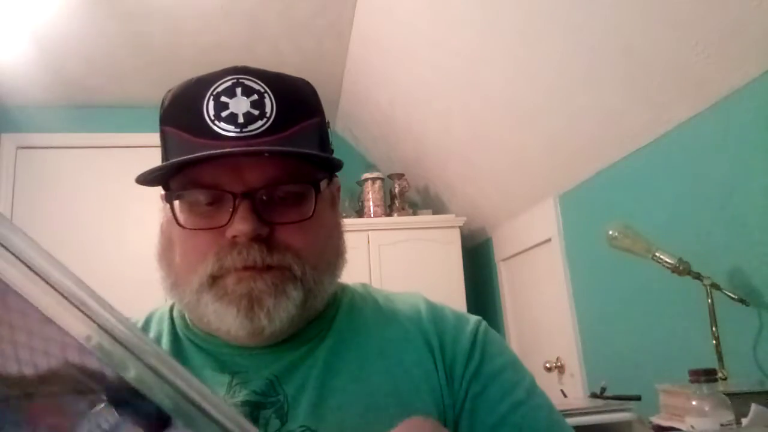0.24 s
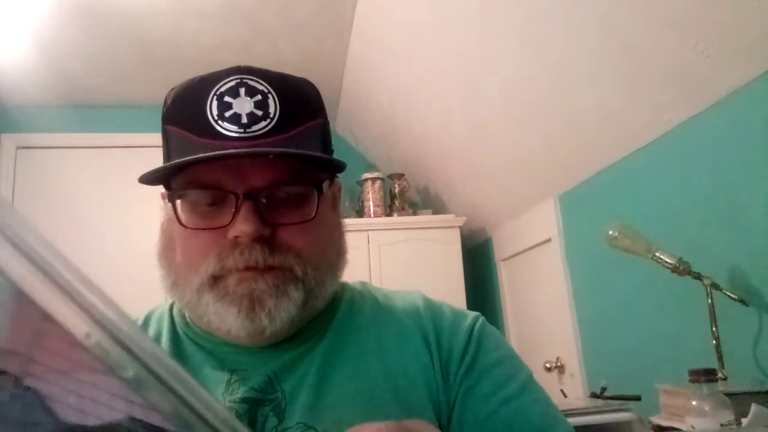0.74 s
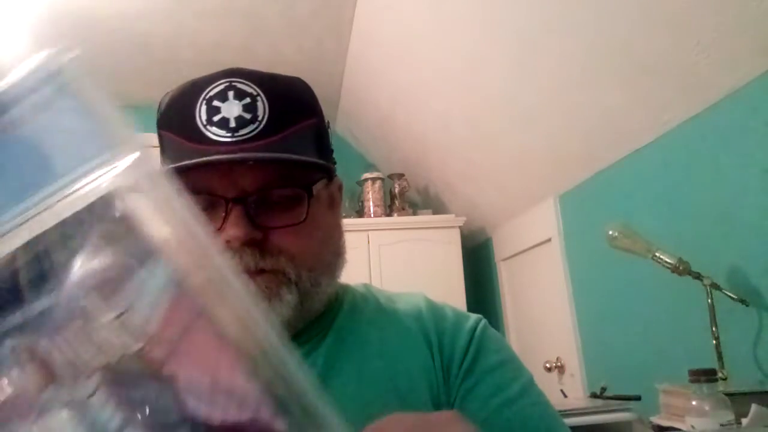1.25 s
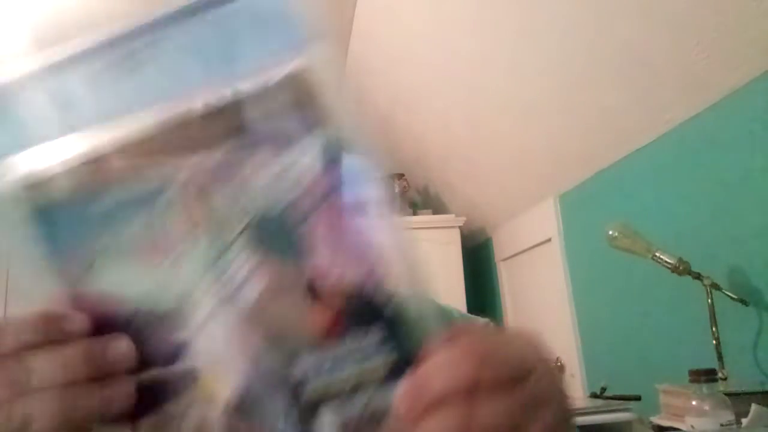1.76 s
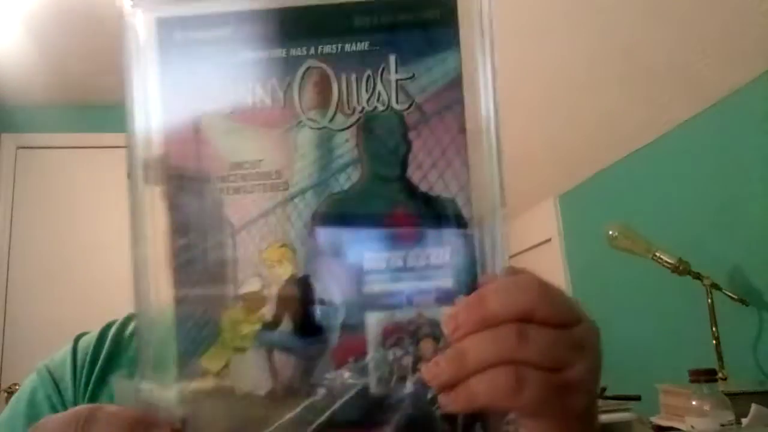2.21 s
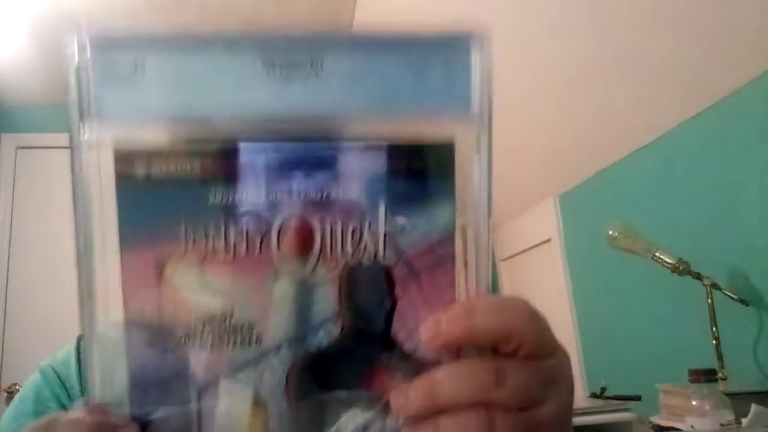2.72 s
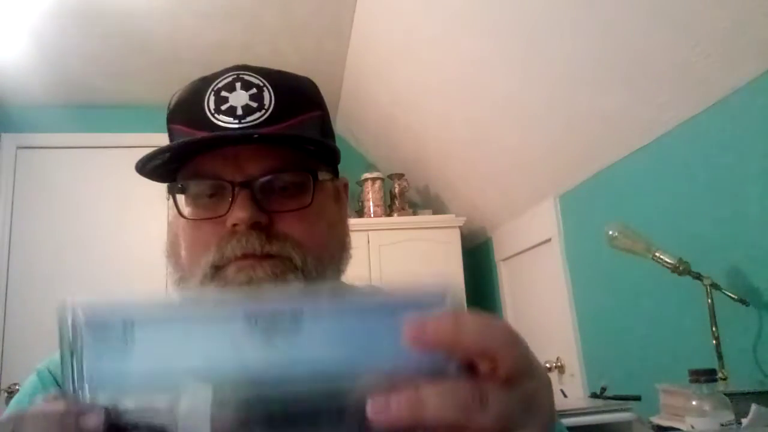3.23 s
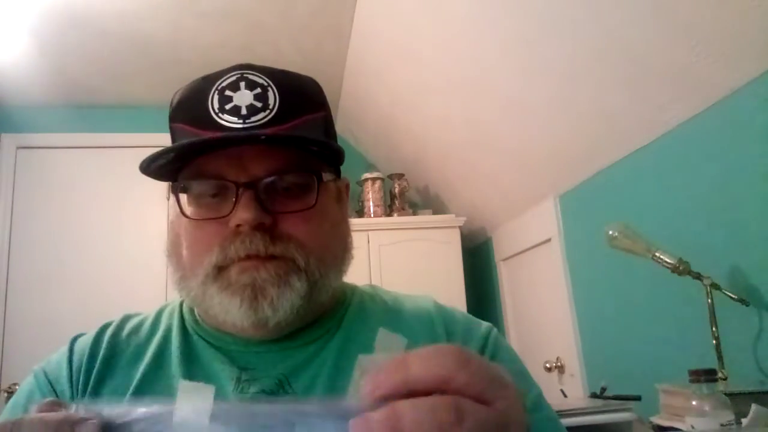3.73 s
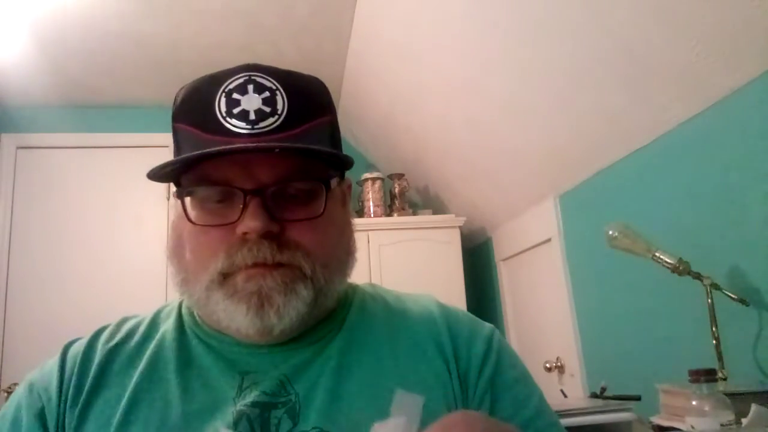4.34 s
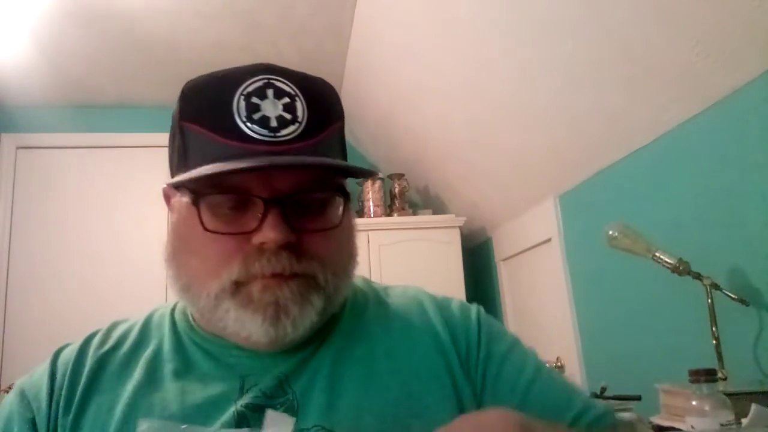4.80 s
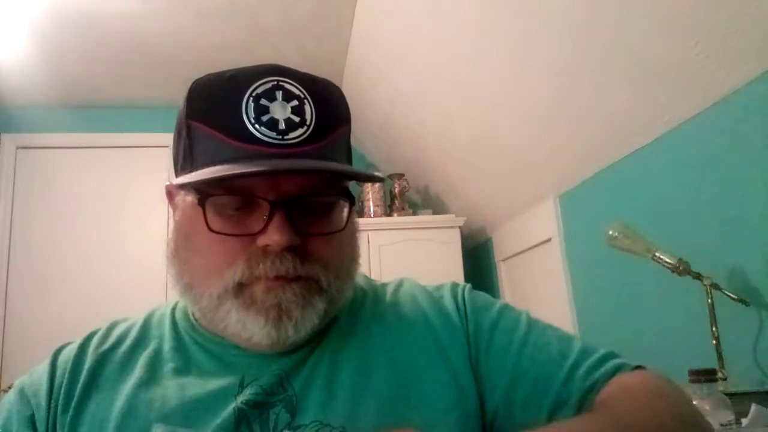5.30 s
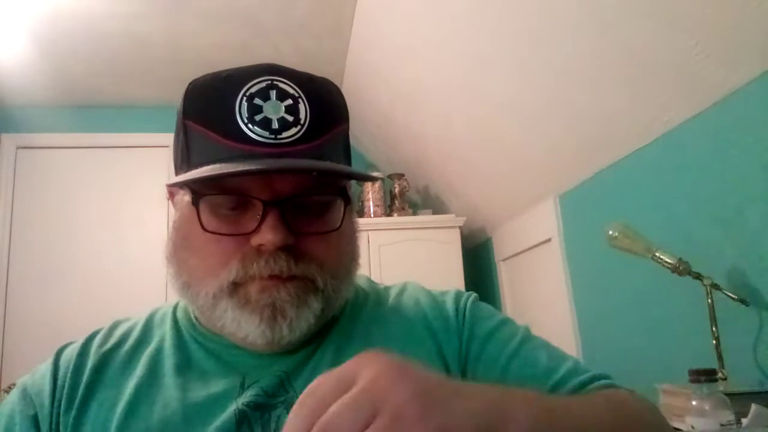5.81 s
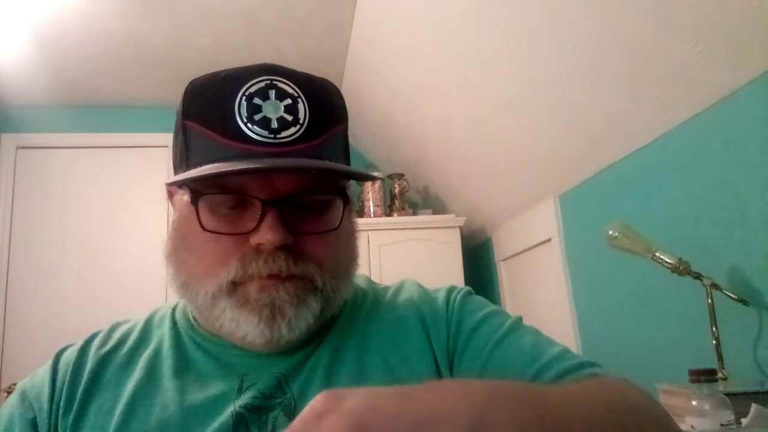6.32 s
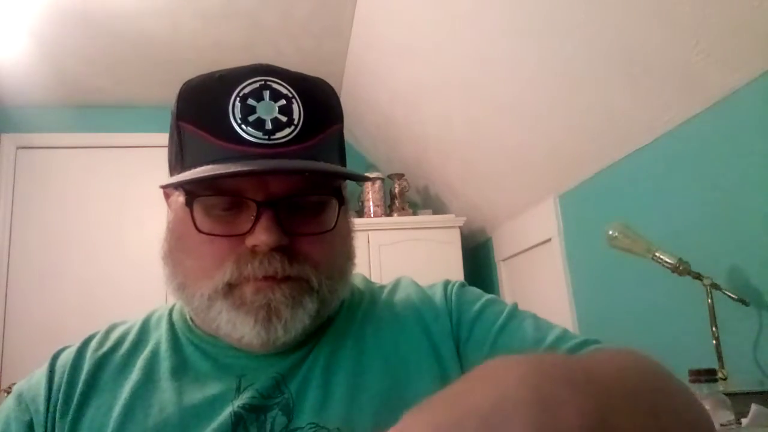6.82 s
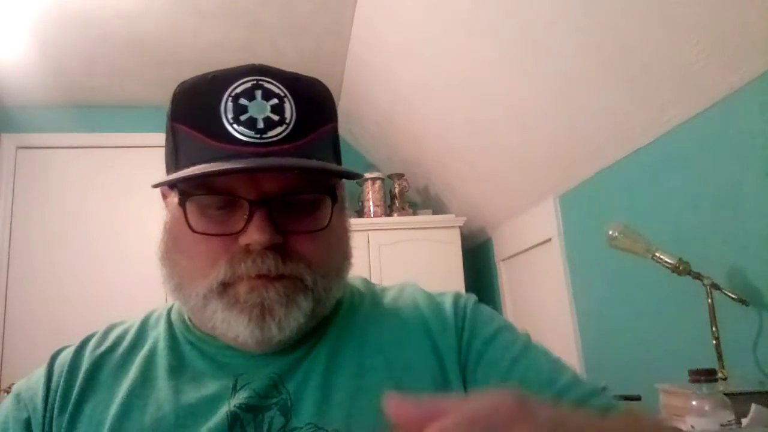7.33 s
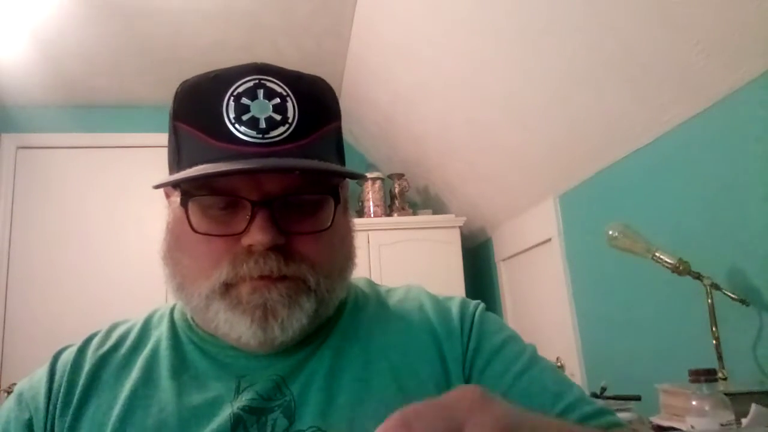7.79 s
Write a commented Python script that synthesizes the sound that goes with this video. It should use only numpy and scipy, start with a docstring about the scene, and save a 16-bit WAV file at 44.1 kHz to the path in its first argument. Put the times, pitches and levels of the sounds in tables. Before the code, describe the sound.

Close to a small microphone in a small room, hard plastic cases in thin sleeves are handled at a desk. Faint crinkles and a sharp snap come first, then sliding film, then a busy middle of dense crackling, thick creases snapping, rubbing and hollow knocks. It thins out to a faint scrape and a few last clicks over soft desk boom and faint hiss.

```python
"""Hard plastic comic cases are handled at a desk in a small room, close to a small microphone.
First a few faint crinkles and one sharp snap with a light knock; then the thin plastic sleeve slides more often.
In the middle, clumps of tiny buckles crackle and larger creases snap thickly; the case rubs, scrapes and knocks.
Later the moves thin out to a faint scrape and a last few snaps. Noise through the desk's resonances booms softly
throughout, decaying noise makes the walls answer, and filtered noise leaves a faint hiss."""
import sys
import numpy as np
from scipy import signal
from scipy.fft import rfft, irfft, next_fast_len
from scipy.io import wavfile
from scipy.ndimage import uniform_filter1d, map_coordinates

SR = 44100
rng = np.random.default_rng(int(sys.argv[2]) if len(sys.argv) > 2 else 0)


def wrap_up_sound(samples):
    """Save the sound to the file named by the first command line argument, as 16-bit audio."""
    columns = np.atleast_2d(samples).T
    # keep every value between -1 and 1, then stretch to whole-number steps
    tamed = np.clip(columns, -1, 1)
    steps = np.round(tamed * 32767).astype(np.int16)
    wavfile.write(sys.argv[1], SR, steps)


N = 355132
TIME = np.arange(N) / SR  # [s]

# The hands push or pull the sleeve over the case; levels are relative, trimmed in the mix:
# (start [s], length [s], crinkle level [dB], case rubbing level [dB], extra fizz on top [dB])
SLEEVE_STROKES = [(0.0, 0.038, -54, -78, -3), (0.192, 0.096, -50, -57.5, 1), (0.482, 0.13, -56, -62, -1.5),
                  (0.761, 0.37, -54, -63, -10), (0.855, 0.095, -44.5, -47.5, 9.5),
                  (1.253, 0.038, -50.5, -72, 1), (1.42, 0.19, -50.5, -78, 4), (1.572, 0.036, -46, -62, 3),
                  (1.686, 0.1, -55, -62, -18), (2.139, 0.17, -52, -78, -1), (2.305, 0.2, -41.5, -51.5, 2.5),
                  (2.591, 0.47, -46.5, -50.5, 4.5), (2.659, 0.097, -40, -48.5, 3.5),
                  (2.971, 0.064, -46.5, -65, 12.5), (3.014, 0.086, -35, -45.5, -3),
                  (3.268, 0.14, -42, -53, 0), (3.314, 0.03, -34.5, -46, 2), (3.485, 0.061, -50, -92, 1),
                  (3.577, 0.022, -42, -75, -1), (3.772, 0.18, -45.5, -58.5, 5.5),
                  (3.845, 0.083, -42, -71, 3), (3.904, 0.048, -35, -39.5, -3), (4.165, 0.17, -53, -70, 0),
                  (4.394, 0.16, -53, -62.5, -2), (4.601, 0.22, -52, -67.5, 4.5),
                  (5.033, 0.016, -48, -84, -1), (5.283, 0.097, -44, -60, 7), (5.397, 0.18, -52, -67, -6),
                  (5.932, 0.088, -48.5, -53, -9), (6.156, 0.028, -45, -57, 3.5),
                  (6.263, 0.056, -54.5, -83, -23), (6.356, 0.037, -53, -65, -7),
                  (6.453, 0.052, -43.5, -53, -8), (6.637, 0.33, -51, -62, -11),
                  (6.709, 0.16, -43.5, -50, -1.5), (7.027, 0.015, -42, -47, -8),
                  (7.592, 0.022, -59.5, -80, -6), (7.758, 0.046, -54.5, -74, -16)]
# Beneath and between the strokes the held sleeve keeps stirring softly:
# (start [s], length [s], crinkle level [dB], case rubbing level [dB], extra fizz on top [dB])
SLEEVE_HOLDS = [(0.0, 0.32, -59, -82.5, -12), (0.617, 0.23, -64.5, -75, -9),
                (0.763, 1.04, -63.5, -67.5, -14), (2.239, 1.834, -57, -72.5, -21),
                (4.201, 0.62, -60.5, -69, -5), (4.801, 0.43, -61, -81, -13), (5.305, 0.48, -64.5, -88, -8),
                (5.918, 1.24, -63.5, -73.5, -19), (7.824, 0.2, -81.5, -77.5, -18)]


def effort(release_s=0.12, sag_db=2.5, swell_share=0.34, swell_limit_s=0.07, jerk_db=6, jerk_rate=40, jerk_s=0.04):
    """Gains of crinkle, rubbing and fizz: each move swells, eases off and dies away, in small sudden slips."""
    power = np.zeros((3, N))
    for start, length, crinkle_db, case_db, fizz_db in SLEEVE_STROKES + SLEEVE_HOLDS:
        # a longer move gathers speed for longer, up to a limit
        swell = min(swell_share * length, swell_limit_s)
        t = np.arange(int((swell + length + release_s) * SR)) / SR - swell / 2
        rise = np.clip(.5 + t / swell, 0, 1) ** 2
        sag = amp(sag_db * (.5 - np.clip(t / length, 0, 1)))
        release = fade(np.maximum(t - length, 0), release_s)
        shape = rise * sag * release
        for track, db in zip(power, (crinkle_db, case_db, crinkle_db + fizz_db)):
            add(track, start - swell / 2, (amp(db) * shape) ** 2)
    # the film sticks and slips: jerk_rate slips a second, each decaying with a t60 of jerk_s
    starts = rng.random(N) < jerk_rate / SR
    slips = signal.lfilter([1], [1, -fade(1 / SR, jerk_s)], starts)
    return np.sqrt(power) * unit(amp(jerk_db * np.minimum(slips, 1)))


def crackles(rate, clump_db, spread_db, life, low_hz, high_hz, count=200):
    """Clumps of tiny buckles, each ringing one facet of the film for a few cycles; rms 1."""
    density = rate * unit(amp(clump_db * wobble(45)))  # [buckles per s]
    starts = np.flatnonzero(rng.random(N) < density / SR)
    pitch, size, phase = rng.random((len(starts), 3)).T[:, :, None]
    t = np.arange(count) / SR
    gain = amp(-spread_db * np.log(size + .03))  # many small buckles, few large ones
    hz = low_hz + pitch * (high_hz - low_hz)
    grains = gain * fade(t, life) * np.sin(2 * np.pi * (hz * t + phase))
    places = starts[:, None] + np.arange(count)
    track = np.bincount(places.ravel(), grains.ravel(), N + count)[:N]
    # the hand feeds in energy steadily, however it is shared among the buckles
    power = np.abs(uniform_filter1d(track ** 2, size=1100))
    return unit(track / np.sqrt(power + power.mean() / 20))


# Tone of the crinkling sleeve: (frequency [Hz], gain [dB])
FILM_TONE = [(290, -31), (500, -1), (950, -1), (1250, 0), (1530, -2), (2070, 2), (3300, 0.5), (6500, 1.5),
             (7400, -9), (8300, -9), (13400, -16.5), (15100, -7), (16200, -22)]


def sleeve(gain, fizz_gain, fizz_hz=7500, crackle_db=-4, tick_db=-3.5, edge_db=-12, slide_db=-9, brisk_db=-47):
    """The film crackles finely, ticks where a larger crease gives way, and hisses as it slides."""
    speed = np.clip(np.sqrt(gain / amp(brisk_db)), .25, 2)  # slow hands: fewer buckles, softer edges
    fine = crackles(rate=1400 * speed, clump_db=4, spread_db=0.5, life=0.0044, low_hz=890, high_hz=7470)
    coarse = crackles(rate=300 * speed, clump_db=3, spread_db=4.0, life=0.0026, low_hz=1340.0, high_hz=7920)
    edge = unit(np.diff(np.tanh(coarse), prepend=0))  # sharpened larger buckles
    slide = flexed(rng.standard_normal(N), depth_db=-2.5, size=512)
    slide = slide * unit(amp(5.8 * np.tanh(wobble(250))))  # uneven sliding
    film = amp(crackle_db) * unit(coloured(fine, FILM_TONE))
    film += amp(tick_db) * unit(coloured(coarse, FILM_TONE))
    film += amp(edge_db) * speed * unit(coloured(edge, FILM_TONE))
    film += amp(slide_db) * unit(coloured(slide, FILM_TONE))
    film = flexed(film, depth_db=3.0, size=384) * np.std(film)
    # split at fizz_hz so that the top follows its own gain
    body = filtered(film, lambda hz: 1 / (1 + (hz / fizz_hz) ** 10))
    return gain * body + fizz_gain * (film - body)


# Creases that snap, levels before the trim and tone of snaps(): (time [s], peak level [dB], pitch [Hz])
CREASE_SNAPS = [(0.071, -49, 2740), (0.093, -49, 4500), (0.2002, -18.5, 5790), (0.8419, -14.5, 5300),
                (0.8704, -37, 2560), (0.917, -21, 3330), (1.013, -23.5, 5630), (1.1956, -30, 4320),
                (1.2106, -35, 5000), (1.2487, -23.5, 4630), (1.4157, -23, 6200), (1.4291, -17.5, 6260),
                (1.5356, -19, 5990), (1.715, -34, 2540), (1.7574, -25.5, 3240), (2.1814, -26.5, 5970),
                (2.3085, -21, 5800), (2.396, -21.5, 2450), (2.4395, -16, 5700), (2.4736, -21, 6320),
                (2.59, -20, 5650), (2.7213, -17.5, 4627), (2.7881, -20.5, 3320), (2.9188, -23, 3176),
                (2.9773, -25.5, 4655), (3.0436, -12.5, 5232), (3.0455, -16.5, 3100), (3.1063, -20, 2593),
                (3.32, -28, 5007), (3.3423, -30, 6600), (3.4075, -17.5, 4400), (3.459, -20, 6420),
                (3.4973, -27.5, 2483), (3.599, -25.5, 3005), (3.6756, -19, 4383), (3.7795, -21.5, 2600),
                (3.8108, -29, 2130), (3.835, -26, 5230), (3.8797, -17, 4540), (4.1788, -20.5, 5220),
                (4.1795, -29, 2082), (4.1854, -27, 5570), (4.3046, -28.5, 4430), (4.3897, -24, 6490),
                (4.4162, -29.5, 1982), (4.563, -24.5, 3775), (4.6418, -27, 4724), (4.6991, -10.5, 5410),
                (4.8048, -31.5, 4050), (4.9077, -25.5, 4510), (4.9748, -27.5, 6400), (5.032, -35, 4210),
                (5.1195, -38, 2615), (5.158, -38, 2260), (5.2885, -24, 6050), (5.307, -29, 2453),
                (5.3295, -30, 2364), (5.3572, -22, 6470), (5.3623, -21.5, 4387), (5.634, -36, 2300),
                (5.72, -21.5, 5760), (5.8411, -34, 3865), (5.9097, -32, 3092), (5.9616, -28, 3010),
                (6.0109, -28, 4006), (6.147, -32.5, 2658), (6.1742, -25.5, 3154), (6.2486, -29, 6080),
                (6.2704, -26, 3350), (6.4486, -17, 2660), (6.4656, -18.5, 5255), (6.4932, -13, 3494),
                (6.7359, -29.5, 2113), (6.766, -21, 6525), (6.837, -35, 1608), (6.913, -29.5, 2810),
                (7.0258, -29, 2135), (7.0316, -24, 2622), (7.6, -51.5, 1652), (7.7615, -28.5, 5860)]
# Colour of a snap at the microphone: (frequency [Hz], gain [dB])
SNAP_COLOUR = [(100, -14.5), (500, -8.5), (2000, 7.5), (6700, 6), (8000, -3), (13500, -12.5), (15200, -2.5),
               (16500, -11)]


def snaps(creases, snap_db=-3.0, cycles=9, flutter_db=-21, flutter_life=0.023, lead=0.0023, lead_db=-17, flap_db=-16):
    """A crease flips and flutters; that rings its small facet and the film around it."""
    track, t = np.zeros(N), np.arange(SR // 40) / SR
    for s, db, hz in creases:
        force = amp(flutter_db) * rng.standard_normal(len(t)) * fade(t, flutter_life)
        force[0] = 1  # the flip itself
        facet = np.cos(2 * np.pi * hz * t) * fade(t, cycles / hz)
        flap_hz = hz / 2 * np.exp(0.14 * rng.normal())
        flap = np.cos(2 * np.pi * flap_hz * t) * fade(t, cycles / flap_hz / 2)
        snap = signal.fftconvolve(force, facet + amp(flap_db) * flap)
        snap *= amp(db + snap_db) / np.abs(snap).max()
        add(track, s, snap)
        # a faint copy a few ms earlier softens the attack
        add(track, s - lead * rng.uniform(0.36, 4.3), amp(lead_db) * snap)
    return coloured(track, SNAP_COLOUR)


def small_creases(gain, rate=25, over_db=19, limit_db=-31.5, scatter_db=3):
    """Random light snaps while the film moves, stronger as it crinkles harder: (s, dB before trim, Hz)."""
    rows = []
    for when, size, pitch in rng.random((int(rate * N / SR), 3)):
        stir = gain[int(when * N)]
        if stir > 0:
            db = min(20 * np.log10(stir) + over_db, limit_db)
            db += scatter_db * (2 * size - 1)
            rows.append((when * N / SR, db, 2200 + 3800 * pitch))
    return rows


# Tone of the rubbed case: (frequency [Hz], gain [dB])
RUB_TONE = [(40, -18.5), (120, -7), (270, -10), (400, -3), (520, -1), (800, -2.5), (1300, -9.5), (1550, -8),
            (2000, -7.5), (3200, -39.5)]
# Resonances of the stiff case, rung by rubs here and by knocks below: (frequency [Hz], width [Hz], gain [dB])
CASE_MODES = [(406.6, 14, 19), (602, 78, 2), (784, 17, -1), (1110, 55, 4), (1221, 40, 9.5), (1850, 34, 6)]


def rubbing(gain, rub_db=-1.5, ring_db=-8, slip_rate=2600, firm_db=-52, damping=0.3):
    """Fingers and film catch and slip on the hollow case, which rings more freely the lighter the grip."""
    slips = rng.standard_normal(N) * (rng.random(N) < slip_rate / SR)  # slip_rate a second
    body = amp(rub_db) * flexed(coloured(slips, RUB_TONE), depth_db=5.5, size=768)
    firm = amp(firm_db)
    freedom = (firm / np.maximum(gain, firm / 20)) ** damping
    ring = unit(ringing(slips, CASE_MODES))
    return gain * (body + amp(ring_db) * freedom * ring)


def press(t, length, attack, release):
    """Pressure builds, holds until length seconds and is let go, with release as its t60."""
    return np.clip(t / attack, 0, 1) * fade(np.maximum(t - length, 0), release)


# An edge of the case drags and sings; a narrow ring is a squeak, a wide one a scrape. Levels before trim:
# (start [s], length [s], level [dB], centre pitch [Hz], width [Hz])
EDGE_SCRAPES = [(0.46, 0.06, -57, 2530, 497), (1.697, 0.054, -58.5, 706, 108.4),
                (4.28, 0.19, -57, 1038, 70.14), (4.562, 0.049, -56, 1048, 70.14),
                (5.019, 0.052, -57, 1745, 401.7), (5.329, 0.25, -62, 1500, 698.6),
                (5.668, 0.2, -73, 1048, 55.07), (6.824, 0.059, -49, 1604, 220),
                (7.104, 0.095, -68.5, 5390, 1530), (7.643, 0.44, -64, 1041, 52),
                (7.787, 0.095, -64.5, 5420, 1496)]
# Modes that sing together in a scrape: (multiple of the pitch [ratio], level [dB])
EDGE_MODES = [(0.752, -4.5), (0.911, -5), (1.001, 8), (1.2, -11.5), (1.551, -16)]


def scrapes(scrape_db=-1, swell=0.6, release=0.14, glide=0.023, chatter_db=3.0, wander_rate=26, wander=0.7):
    """Uneven friction keeps case modes ringing; they waver, swell and creep up as the grip tightens."""
    track, t = np.zeros(N), np.arange(SR // 2) / SR

    def drift(rate):
        """A smooth random curve over one scrape, rate knots a second."""
        return map_coordinates(rng.standard_normal(SR // 40), [t * abs(rate)], mode="mirror")

    for start, length, db, hz, width_hz in EDGE_SCRAPES:
        creep = 1 + glide * (np.minimum(t / length, 1) - .5)
        pitch = hz * creep + wander * width_hz / 2 * drift(wander_rate)
        phase = 2 * np.pi * np.cumsum(pitch) / SR
        ring = np.zeros(len(t))
        for ratio, level in EDGE_MODES:
            # two drifting quadratures make a narrow band of noise around the mode
            mode = drift(width_hz) * np.cos(ratio * phase) + drift(width_hz) * np.sin(ratio * phase)
            ring += amp(level) * mode
        ring *= amp(chatter_db * drift(width_hz))
        ring /= np.std(ring[t < length])
        add(track, start, amp(db + scrape_db) * ring * press(t, length, swell * length, release))
    return track


# The case is tapped, bumped or set down, levels before trim and tone: (time [s], level [dB], knock pitch [Hz])
CASE_KNOCKS = [(0.202, -40, 1250), (0.916, -39.5, 384), (1.796, -39.5, 166), (2.309, -37.5, 448.3),
               (2.813, -34, 1030), (2.882, -36.5, 402.2), (2.92, -36, 402.7), (3.059, -40.5, 210.8),
               (3.32, -40, 786), (3.922, -30.5, 1090), (3.929, -41, 96.5), (3.94, -43, 235),
               (4.245, -43.5, 483), (4.699, -44, 553.8), (4.94, -47.5, 814.3), (5.291, -41, 862),
               (5.348, -35.5, 694.6), (6.011, -37, 523.6), (6.165, -36.5, 484), (6.268, -43, 420),
               (6.492, -28.5, 506.3), (6.5, -40.5, 170.3), (6.635, -36, 581.3), (7.032, -40.5, 1028),
               (7.11, -46.5, 1400), (7.786, -46.5, 615.3)]


def knocks(knock_db=-2, cycles=12, clatter=0.94, ring_db=-12):
    """Dull blows die within a few cycles in the hands; higher ones clatter more, and all stir the case."""
    track, t = np.zeros(N), np.arange(SR // 6) / SR
    for s, db, hz in CASE_KNOCKS:
        push = np.sin(2 * np.pi * hz * t) * (1 - np.exp(-2 * hz * t))
        rattle = clatter * hz / 600 * rng.standard_normal(len(t))
        add(track, s, amp(db + knock_db) * (push + rattle) * fade(t, cycles / hz))
    dull = coloured(track, [(30, -18.5), (120, -2.0), (1200, 11.0), (4000, -0.5), (9000, -55.5)])
    return dull + amp(ring_db) * ringing(track, CASE_MODES)


# Arms and case lean on the desk: (start [s], length [s], level [dB])
DESK_LEANS = [(0.0, 0.35, -67.5), (0.927, 0.41, -64), (2.397, 0.065, -57.5), (2.685, 0.035, -59),
              (3.047, 0.089, -61), (4.299, 0.15, -69), (5.11, 0.097, -67), (6.2, 0.29, -75),
              (6.993, 0.14, -61), (7.591, 0.054, -67.5)]
# Resonances of the desk top: (frequency [Hz], width [Hz], gain [dB])
DESK_MODES = [(85, 95, -14), (120.5, 5.4, 5.5), (167, 19, -8)]


def desk(rest_db=-75, attack=0.019, release=0.28):
    """The desk top booms faintly under the resting arms, and more whenever the weight shifts."""
    weight = np.full(N, amp(rest_db))
    for start, length, db in DESK_LEANS:
        weight += amp(db) * press(TIME - start, length, attack, release)
    rumble = coloured(rng.standard_normal(N), [(25, -29.0), (60, -2.0), (190, 3.5), (400, -24.5), (900, -51.0)])
    boom = ringing(rumble, DESK_MODES)
    # level out the boom so that the weight sets its loudness
    power = np.abs(uniform_filter1d(boom ** 2, size=4400))
    return weight * boom / np.sqrt(power + power.mean() / 10)


# Decay of the walls' answer: (frequency [Hz], t60 [s])
WALL_DECAY = [(150, 0.22), (600, 0.22), (3000, 0.25), (7000, 0.2), (15000, 0.2)]


def room(x, gap=.004, size=4000):
    """The walls answer with decaying noise, drawn afresh for each short overlapping piece."""
    out = np.zeros(N)
    for start in range(0, N, size):
        hz, t, z = signal.stft(rng.standard_normal(SR // 2), SR, nperseg=256)
        tail = signal.istft(z * fade(t, along(WALL_DECAY, hz)[:, None]), SR)[1]
        # the answer comes gap seconds late
        piece = x[start:start + 2 * size]
        piece = piece * np.sin(np.pi * np.arange(len(piece)) / (2 * size))
        add(out, start / SR + gap, signal.fftconvolve(piece, tail / np.linalg.norm(tail)))
    return out


# Tone of the still room and microphone: (frequency [Hz], gain [dB])
QUIET_TONE = [(25, -26.5), (60, -11), (110, -7), (175, -11.5), (250, -15), (420, -17), (600, -21.5),
              (1500, -30), (6300, -34), (8200, -45), (13500, -45.5), (15300, -34.5), (16500, -34.5)]


def background(level_db=-70):
    """The still room and the hiss of the microphone, as steady filtered noise."""
    return amp(level_db) * unit(coloured(rng.standard_normal(N), QUIET_TONE))


def amp(db):
    """Decibels to gain."""
    return 10 ** (np.asarray(db) / 20)


def unit(x):
    """Scaled to rms 1."""
    return x / np.sqrt(np.mean(x ** 2) + 1e-20)


def fade(t, t60):
    """A decay of 60 dB in t60 seconds."""
    return np.exp(-np.log(1000) * t / t60)


def along(points, hz):
    """(Hz, value) points read on a log axis."""
    f, v = np.transpose(points)
    return np.interp(np.log(hz + 1), np.log(f + 1), v)


def wobble(rate):
    """A smooth random curve, rate knots a second."""
    return map_coordinates(rng.standard_normal(int(N * rate / SR) + 4), [TIME * rate])


def filtered(x, response):
    """Filter x by a complex response of frequency."""
    size = 2 * next_fast_len(N)
    return irfft(rfft(x, size) * response(np.fft.rfftfreq(size, 1 / SR)))[:N]


def coloured(x, points):
    """Causal filter with the gain of (Hz, dB) points, so that attacks stay sharp."""
    def response(hz):
        """Minimum-phase response, by folding the cepstrum."""
        cepstrum = irfft(np.log(amp(along(points, hz))))
        half = len(cepstrum) // 2
        cepstrum[1:half] *= 2
        cepstrum[half + 1:] = 0
        return np.exp(rfft(cepstrum))
    return filtered(x, response)


def ringing(x, modes):
    """Ring x through resonances given as (Hz, width Hz, dB), with alternating signs."""
    def response(hz):
        """Sum of the band-pass modes."""
        total = 0
        for k, (centre, width, db) in enumerate(modes):
            damped = 1j * hz * width
            total = total + (-1) ** k * amp(db) * damped / (centre * centre - hz * hz + damped)
        return total
    return filtered(x, response)


def flexed(x, depth_db, size):
    """A sheet that bends shifts its resonances: patches of gain drift over time and frequency; rms 1."""
    z = signal.stft(x, nperseg=size)[2]
    field = uniform_filter1d(rng.standard_normal(z.shape), size=3, axis=0)
    field = uniform_filter1d(field, size=8, axis=1)
    patches = amp(depth_db * np.tanh(unit(field)))
    return unit(signal.istft(z * patches, nperseg=size)[1][:N])


def add(track, s, sound):
    """Mix a sound into a track at time s."""
    part = track[max(round(s * SR), 0):][:len(sound)]
    part += sound[:len(part)]


def scene(rustle_wet_db=-4, snap_wet_db=-7, crinkle_db=-1.5):
    """All the handling sounds in the room, over desk and hiss."""
    crinkle, rub, fizz = effort()
    rustle = amp(crinkle_db) * sleeve(crinkle, fizz)
    rustle = rustle + rubbing(rub) + scrapes() + knocks()
    clicks = snaps(CREASE_SNAPS + small_creases(crinkle))
    walls = room(amp(rustle_wet_db) * rustle + amp(snap_wet_db) * clicks)
    return (rustle + clicks + walls + desk() + background())[None]


def record(dry, top_hz=16100):
    """A very steep low-pass leaves almost nothing above the band limit."""
    return np.array([filtered(channel, lambda hz: 1 / (1 + (hz / top_hz) ** 120)) for channel in dry])


dry = scene()
out = record(dry)
wrap_up_sound(out)
```